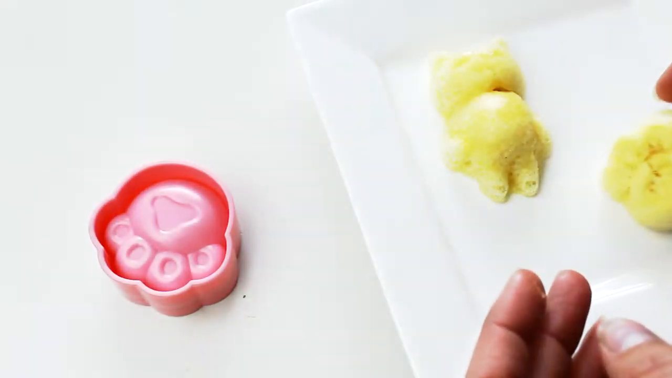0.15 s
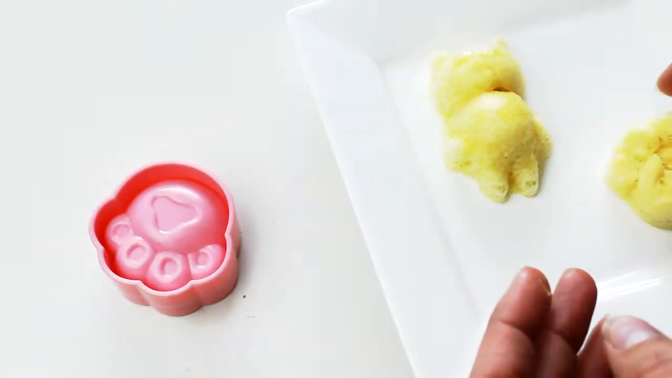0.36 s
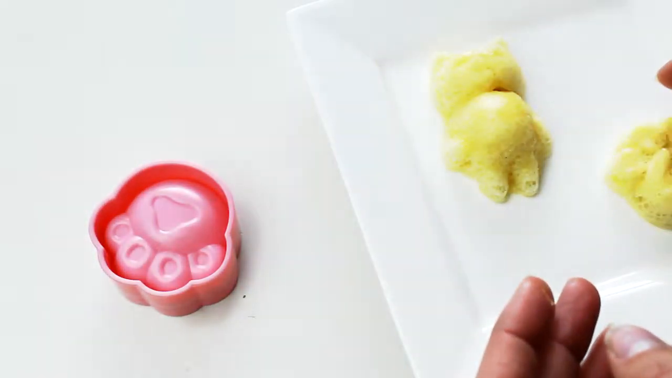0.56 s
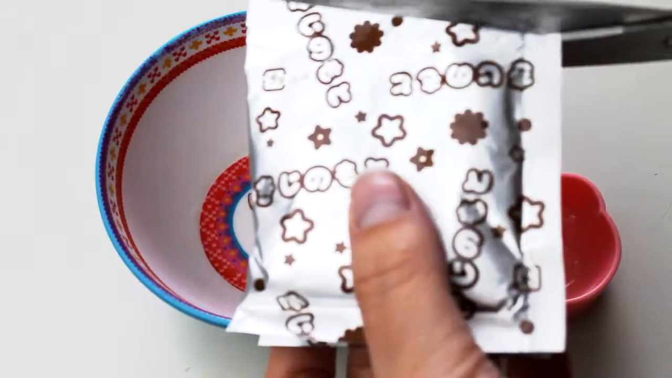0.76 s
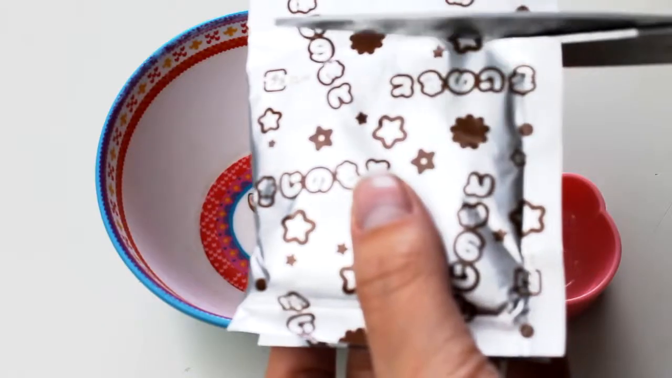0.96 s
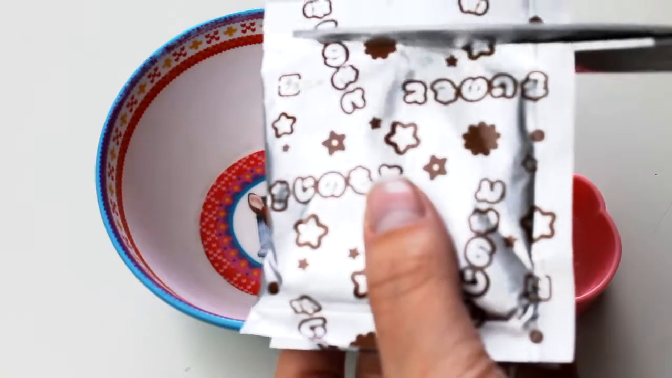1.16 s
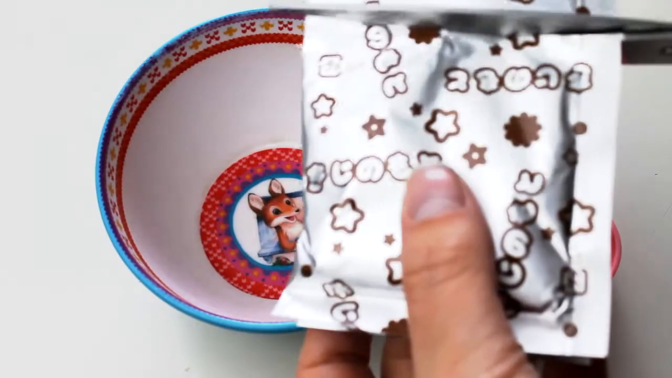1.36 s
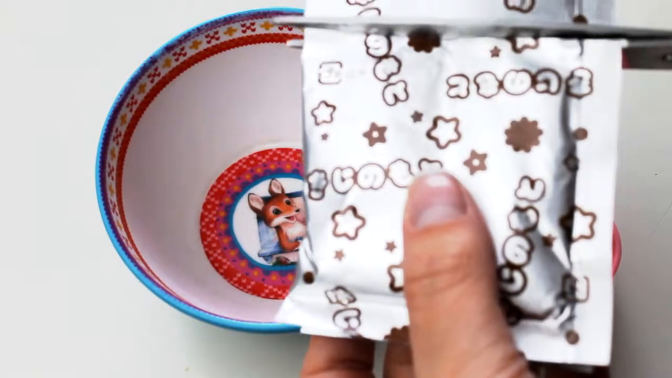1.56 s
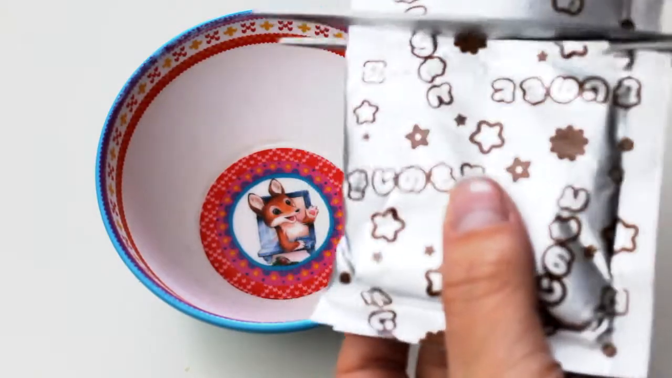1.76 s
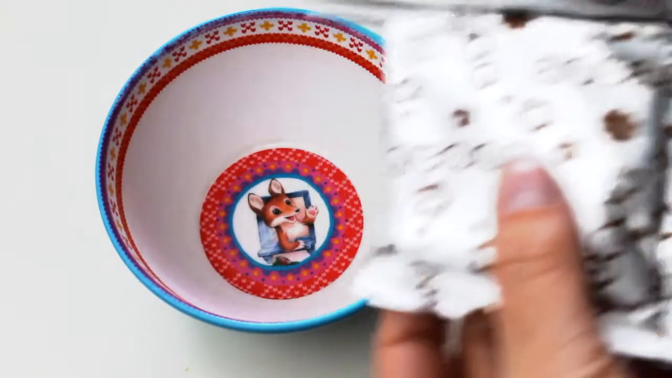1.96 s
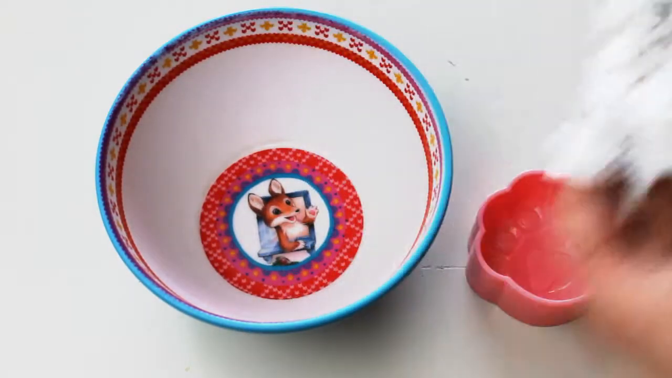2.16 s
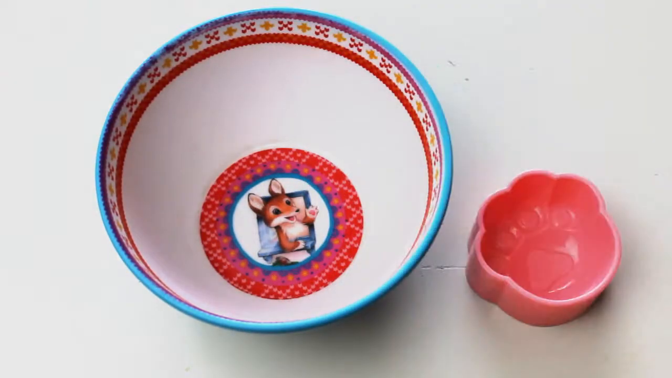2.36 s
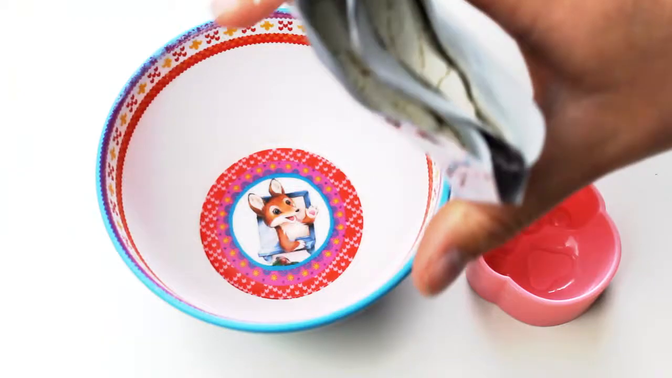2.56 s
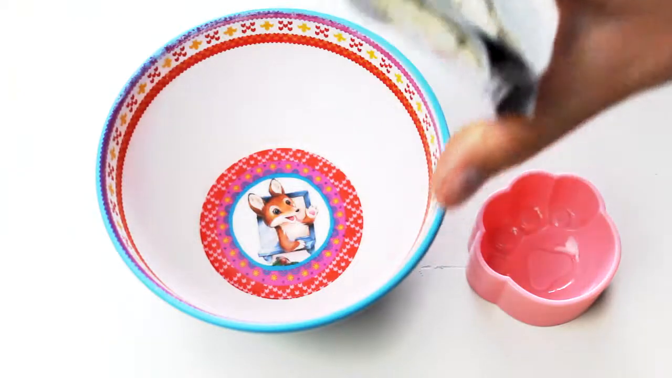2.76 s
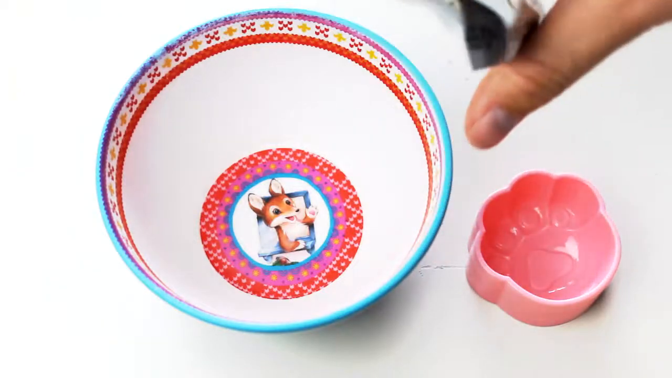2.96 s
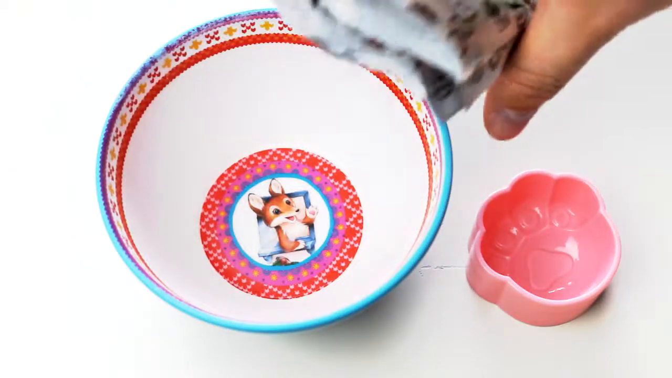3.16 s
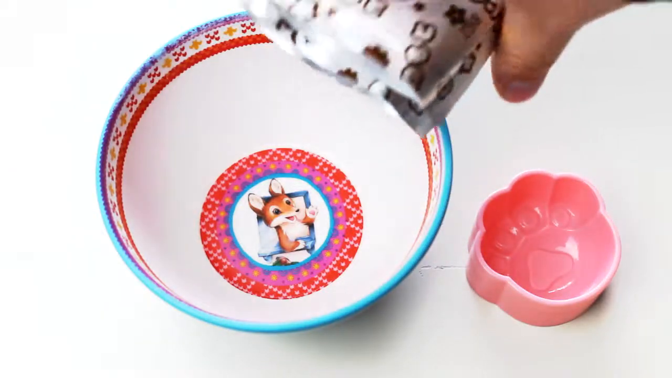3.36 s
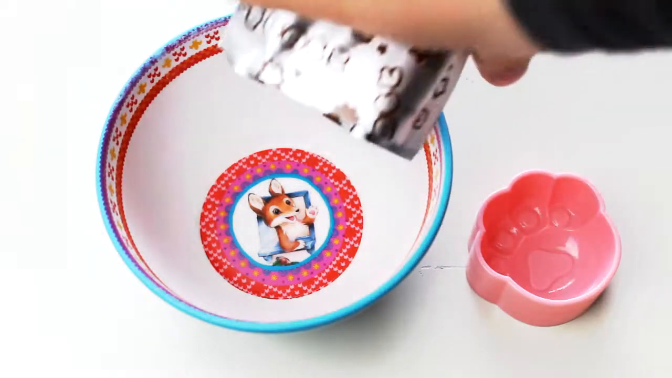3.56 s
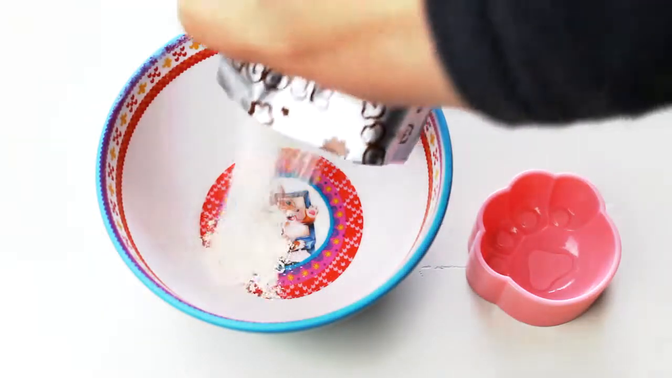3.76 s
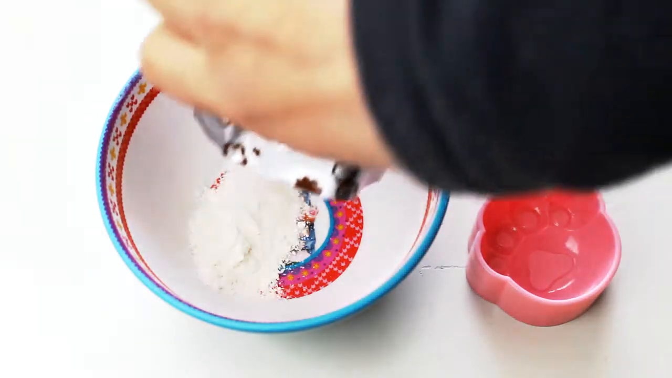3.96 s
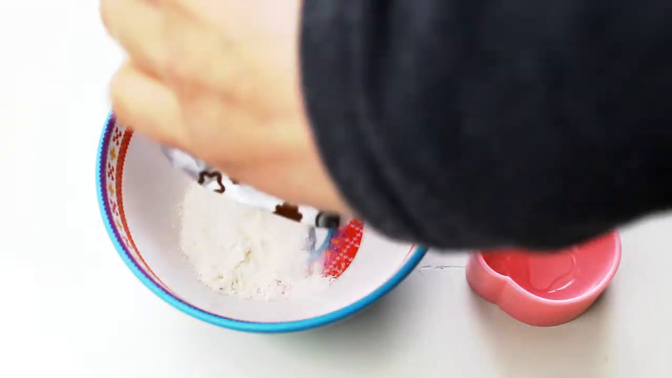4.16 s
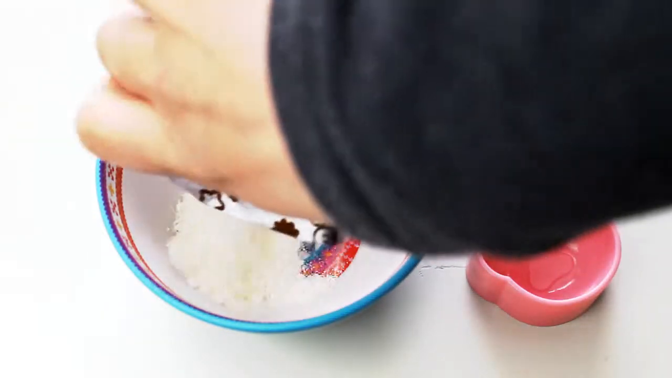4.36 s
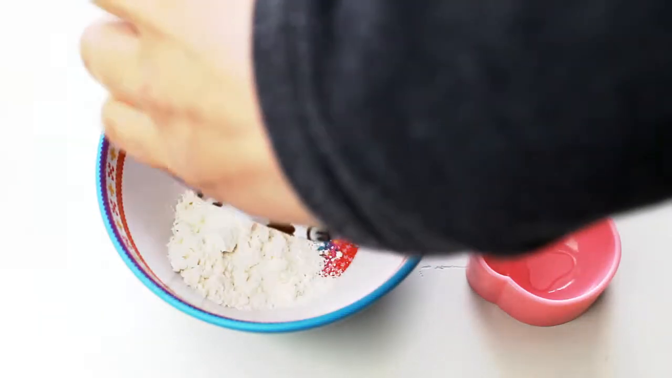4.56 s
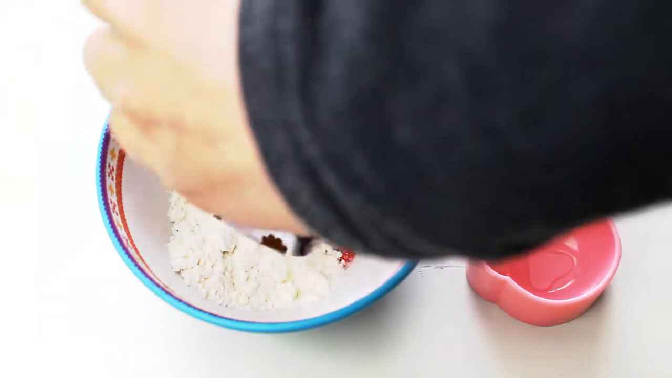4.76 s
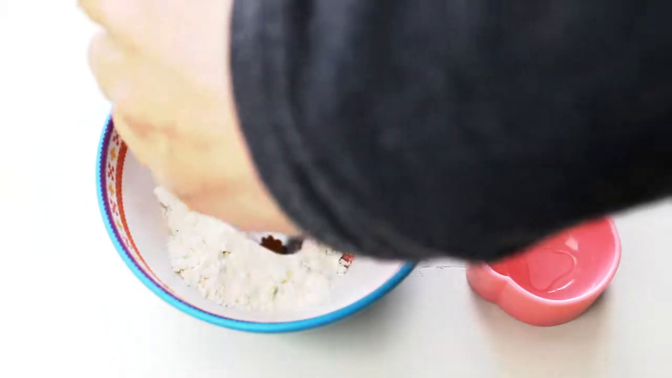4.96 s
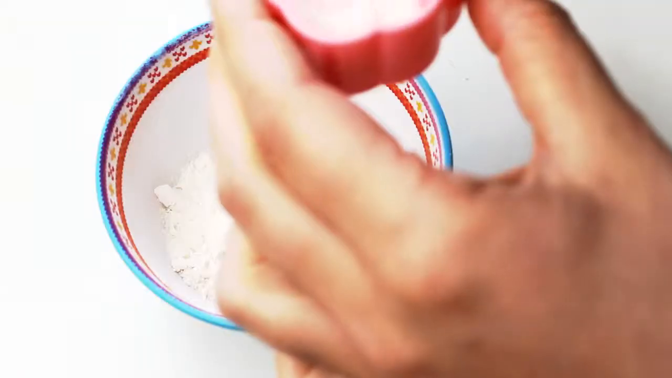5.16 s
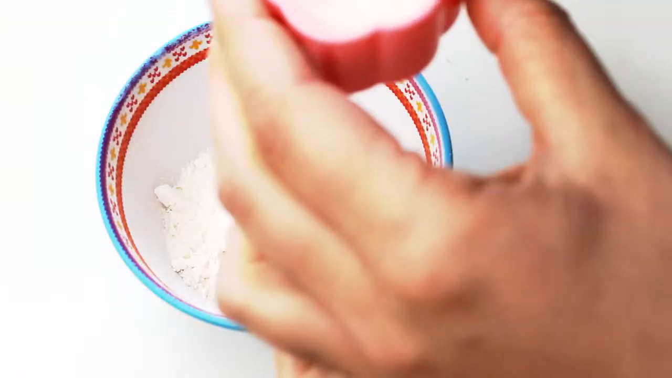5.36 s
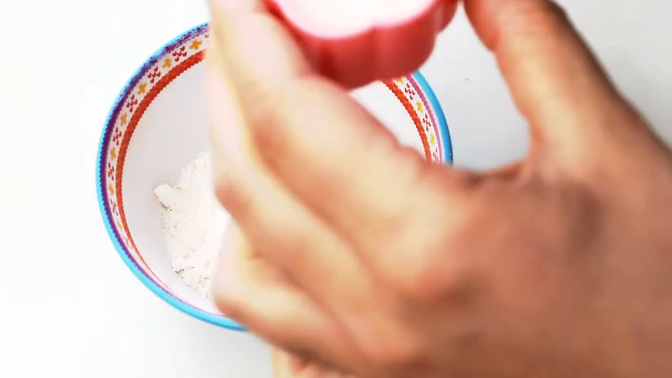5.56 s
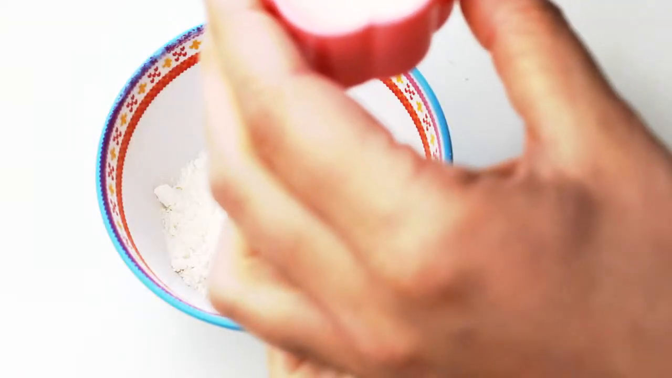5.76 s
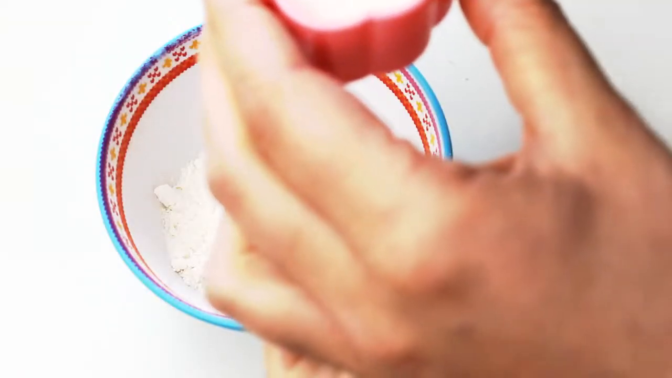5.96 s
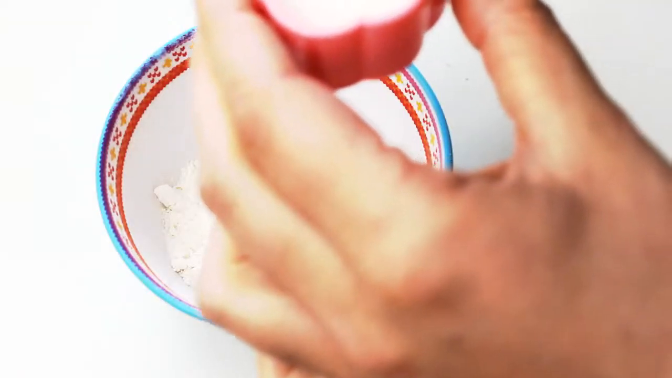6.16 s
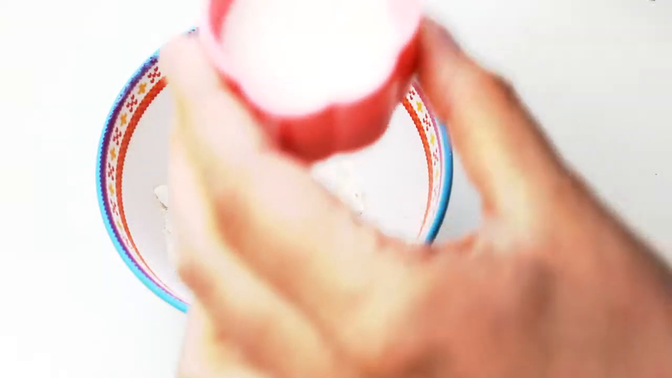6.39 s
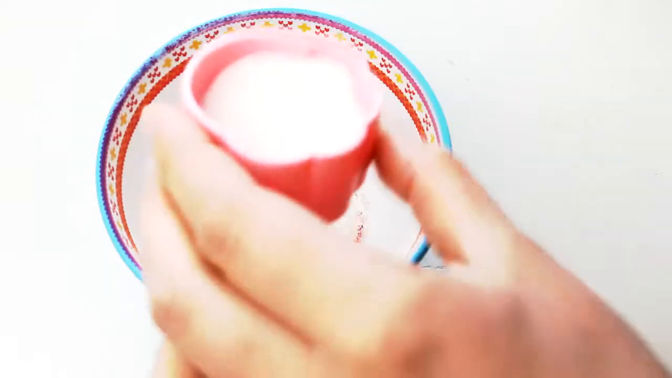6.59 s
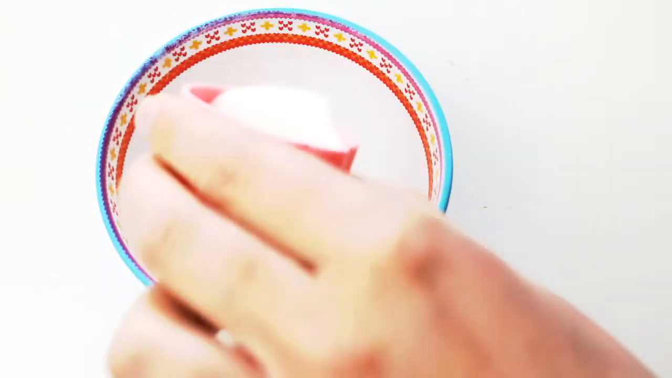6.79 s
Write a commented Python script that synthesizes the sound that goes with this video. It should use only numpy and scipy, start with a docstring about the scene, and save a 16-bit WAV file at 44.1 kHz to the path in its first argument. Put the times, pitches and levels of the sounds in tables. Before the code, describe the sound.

A low sliding rumble gives way to dry, bright foil crackle as blades cut a packet near the microphone. The crinkling fades and cuts to background hiss. Small taps follow, then grainy powder slides out in soft bursts, with hollow rattles, hard foil snaps and a brief ringing bowl knock. Short indoor echoes surround it; only faint hiss and hum remain.

```python
"""Something slides over the table with a soft rumble, then scissors snip open a foil sachet of powder, close by.
Blades crunch through the foil as streams of tiny fractures; creases snap as short noise bursts with ringing panels.
Grainy noise hisses as powder is squeezed and tipped into a bowl, whose modes ring when the sachet knocks it.
A small room adds echoes and a short tail; steady hiss lies beneath, with a faint hum once the crinkling ends."""
import sys
import numpy as np
from scipy import signal
from scipy.io import wavfile
from scipy.ndimage import map_coordinates

SR = 44100
rng = np.random.default_rng(int(sys.argv[2]) if len(sys.argv) > 2 else 0)


def pcm_store(signal):
    """Save signal as 16-bit PCM."""
    levels = np.round(np.clip(np.atleast_2d(signal), -1, 1) * 32767)
    wavfile.write(sys.argv[1], SR, levels.astype(np.int16).T)


N = 301203
TIME = np.arange(N) / SR
OPEN_S = 3.2  # from here on the sachet is open

# single creases that snap, loud and faint: (time [s], crack level [dB], crack pitch [Hz],
# panel ring over crack [dB], panel pitch [Hz], decay [s])
CREASES = [(.739, -50, 7350, -13, 1430, .003), (0.7666, -32.5, 3830, -4.5, 1860, 0.0028),
           (.786, -43, 3900, -1, 1640, 0.002), (.8076, -40.5, 6040, 6, 2880, 0.0058),
           (0.8193, -30.5, 5260, 4.5, 1890, .0024), (0.8487, -34.5, 4860, 4, 1910, 0.0034),
           (.8592, -31, 5300, -4, 2020, 0.001), (0.8672, -32.5, 4200, 4.5, 1740, 0.0022),
           (0.922, -39.5, 6200, 8.5, 1750, 0.0022), (0.9397, -20.5, 6520, -4.5, 1570, 0.0032),
           (0.9617, -27, 7000, 2, 2200, 0.0015), (0.9894, -23.5, 6500, -2, 2280, 0.00046),
           (1.0307, -22, 4670, -3.5, 1880, 0.0016), (1.0514, -25.5, 6500, -1.5, 2690, 0.0012),
           (1.1313, -41.5, 6000, 9.5, 2310, 0.00033), (1.1771, -46.5, 6150, 7, 1870, 0.0048),
           (1.2588, -31.5, 5380, 3.5, 3030, 0.0008), (1.273, -37, 8200, -20, 1300, 0.0038),
           (1.3578, -30, 4600, -1.5, 1230, 0.004), (1.375, -36.5, 5400, 3, 1790, .001),
           (1.3838, -26.5, 4190, -6.5, 1900, 0.0026), (1.434, -36, 6940, -6, 2810, 0.002),
           (1.4665, -31, 7700, 0.5, 1840, 0.0037), (1.5009, -34, 7600, -15, 1410, .005),
           (1.5249, -31.5, 4140, -6, 2060, 0.0012), (1.6641, -39, 4330, 6, 1940, 0.0033),
           (1.673, -41, 4560, 10, 2430, 0.0025), (1.698, -32, 4140, -2.5, 1980, 0.0032),
           (1.765, -36.5, 4750, 7, 2250, 0.0052), (1.7956, -24.5, 5780, -9, 1960, 0.0023),
           (1.886, -17.5, 4630, -8, 2540, 0.0037), (1.9252, -32.5, 8200, 13, 1930, 0.0008),
           (2.0184, -31, 4380, -3, 1960, 0.0034), (2.03, -44.5, 4200, 6.5, 1940, 0.0013),
           (2.0786, -47.5, 6500, -2, 1920, 0.0022), (2.1458, -38.5, 7060, -5, 1670, 0.0038),
           (2.2403, -33.5, 5440, -7, 1320, 0.0028), (2.372, -54, 8400, -6, 1950, 0.0052),
           (2.4027, -48, 7000, -10, 2030, 0.0019), (2.9125, -62, 5090, 13.5, 1474, 0.0047),
           (2.9397, -51.5, 5400, -1, 2270, 0.0027), (3.5188, -44, 4040, 3, 2760, 0.002),
           (3.558, -46, 6000, 6.5, 1400, 0.00078), (3.6435, -31.5, 5670, -0.5, 1230, 0.0026),
           (3.653, -26, 5000, 0, 2000, 0.00051), (3.7105, -55.5, 4310, 15, 2380, 0.0019),
           (3.725, -45.5, 4900, 17.5, 1620, 0.0023), (3.88, -52.5, 7000, 20, 1800, 0.0012),
           (3.8906, -20.5, 5810, -3, 2180, 0.001), (3.9819, -23, 6270, -2, 2000, 0.0011),
           (4.1355, -20.5, 5100, 0, 1900, .0024), (4.2075, -33, 4600, 3.5, 2190, 0.003),
           (4.4223, -50, 4500, 14, 1550, .0048), (4.6077, -57, 5600, 21, 1880, 0.001),
           (4.6188, -32, 4350, -0.5, 1940, 0.002), (4.642, -30.5, 5570, 2, 1870, 0.0019),
           (4.6826, -30.5, 5500, 10, 2180, 0.0018), (4.6931, -26.5, 6440, 5.5, 1900, 0.0016),
           (4.6985, -26.5, 5660, 10, 2100, 0.0028), (4.7098, -26, 4400, 4, 2060, 0.0044),
           (4.7727, -36.5, 4600, 4, 1280, 0.0027), (4.815, -36, 6900, -1, 1800, 0.0027),
           (4.8282, -30.5, 5430, 6, 1530, 0.003), (4.938, -48.5, 6000, 9, 2250, 0.0046),
           (4.9572, -44, 4500, 12, 2150, 0.0025), (4.9696, -25.5, 6170, -1, 1520, .002),
           (4.986, -38, 3570, 7, 2140, 0.0029), (5.0754, -35, 6800, 1.5, 1830, 0.0034)]


def snaps():
    """Single creases flip one by one, each releasing its own burst."""
    out = np.zeros(N)
    for start, *crease in CREASES:
        add(out, start, snap(*crease, start > OPEN_S))
    return out


# relative spectrum of a snap's bright edge: (frequency [Hz], level [dB per Hz])
EDGE_SPECTRUM = [(4500, -21), (7500, 1.5), (9500, -2.5), (12000, -9), (16000, -11)]
# relative spectrum of a snap's dull body: (frequency [Hz], level [dB per Hz])
BODY_SPECTRUM = [(150, -15.5), (380, -12.5), (700, -1.5), (1200, -4.5), (1800, -16.5)]
# the higher the crack, the brighter its edge
EDGE_DB, EDGE_AT_HZ, EDGE_DB_PER_OCTAVE = -9, 5360, 25.5
# big, slow flips push the whole sachet, up to a ring limit; once open, it is pushed less
BODY_DB, BODY_DB_PER_DOUBLING, USUAL_DECAY_S = -6.5, 4.5, 0.002
BODY_RING_LIMIT_DB, OPEN_BODY_DB = 8.5, -8
ATTACK_SHARE = 0.088  # rise time over decay time: slow creases also start slowly


def snap(crack_db, crack_hz, ring_db, ring_hz, decay, is_open):
    """A crease flips in a short burst: a crack with a bright edge, a ringing panel and a push of the sachet."""
    t = np.arange(1100) / SR
    level_scale = np.sqrt(0.005 * SR / len(t))  # levels are rms over 5 ms
    crack_noise, edge_noise, body_noise, ring_noise, facet_noise = rng.standard_normal((5, len(t)))
    edge_db = EDGE_DB + EDGE_DB_PER_OCTAVE * np.log2(crack_hz / EDGE_AT_HZ)
    body_db = BODY_DB + min(ring_db, BODY_RING_LIMIT_DB)
    body_db += BODY_DB_PER_DOUBLING * np.log2(decay / USUAL_DECAY_S) + OPEN_BODY_DB * is_open

    # the flip runs along the crease for a moment, then the foil dies away
    attack = 1 - np.exp(-t / (ATTACK_SHARE * decay))
    burst = attack * (np.exp(-(t / (1.12 * decay)) ** 2) + 0.28 * np.exp(-t / 0.0038))

    # the small facet beside the crease rings high, the large panel low
    facet = unit(band(facet_noise * burst, crack_hz * 0.96, crack_hz * 1.02, order=1))
    crackle = unit(band(crack_noise * burst, 3820, 6620))
    crack = unit(band(facet + 0.88 * crackle, 1700, 9500))
    panel = np.sin(2 * np.pi * ring_hz * t) * (1 - np.exp(-t / 0.00029)) * np.exp(-t / decay)
    rough_ring = unit(band(ring_noise * burst, 1290, 3050, order=3))
    ring = unit(1.2 * unit(band(panel, 560, 7000)) + rough_ring)

    edge = amp(edge_db) * colour(edge_noise * burst, EDGE_SPECTRUM)
    body = amp(body_db) * colour(body_noise * burst, BODY_SPECTRUM)
    return level_scale * amp(crack_db) * (crack + edge + body + amp(ring_db) * ring)


# bites of the blades: (start [s], length [s], crunch level [dB])
BITES = [(.855, 0.022, -44.5), (0.938, 0.041, -37.5), (1.026, 0.024, -32), (1.238, 0.1, -41),
         (1.442, 0.048, -33.5), (1.68, 0.063, -40), (1.818, 0.059, -34.5)]
# short crackles: foil scraping at first, later settling after a snap: (start [s], length [s], crunch level [dB])
FOIL_CRACKLES = [(2.125, .045, -43.5), (2.227, .012, -47.5), (4.135, 0.0089, -40), (4.648, .008, -42)]


def cutting_motion():
    """Bites and short crackles drive the crunch, each with a fast rise and a slower fall in dB per second."""
    bites = [swell(*row, rise=1000, fall=223) for row in BITES]
    crackles = [swell(*row, rise=1000, fall=228) for row in FOIL_CRACKLES]
    return together(bites + crackles)


# the fingers shift their grip and draw the sachet away: (time [s], flexing level [dB])
GRIP_SHIFTS = [(0.821, -42.5), (.95, -39), (1.055, -40.5), (1.18, -53), (1.255, -42.5), (1.36, -39.5),
               (1.53, -46), (1.755, -42), (1.945, -41.5), (2.04, -52), (2.15, -44.5), (2.225, -47),
               (2.345, -50.5), (2.42, -56)]


def gripping_motion():
    """Each shift of the fingers bends the foil briefly."""
    return together(swell(start, 0, db, rise=395, fall=173) for start, db in GRIP_SHIFTS)


# relative spectrum of the tearing foil: (frequency [Hz], level [dB per Hz])
CRUNCH_SPECTRUM = [(1500, -9.5), (2600, 0), (4500, 0.5), (7000, 1), (10000, -4.5), (13000, -3.5),
                   (16000, -12)]
# relative spectrum of the bending sheet: (frequency [Hz], level [dB per Hz])
FLEX_SPECTRUM = [(80, -28), (200, -19), (310, -2.5), (430, -0.5), (800, 0.5), (1300, 4), (2100, 3.5),
                 (2900, -9), (4500, -22)]
SNIP_FLEX_DB, GRIP_CRUNCH_DB = -2.5, -9  # each motion's share of the other's sound


def scissors(cutting, gripping):
    """The foil gives way in a stream of tiny fractures, which shake the sheet and pop its wrinkles."""
    fractures = grains(per_s=1300, spread_db=1.5, smooth=0.7) * amp(2.3 * wander(rate=220))
    buckles = grains(per_s=350, spread_db=2.5, smooth=0.35)
    crunch = shifting(colour(fractures, CRUNCH_SPECTRUM), depth_db=3.0, width_hz=443, hold=0.03)
    crunch = crunch + amp(-8) * ticks(per_s=380)
    flex = shifting(colour(fractures + 0.7 * buckles, FLEX_SPECTRUM), depth_db=4.0, width_hz=258, hold=0.02)
    crunch_gain = together([cutting, amp(GRIP_CRUNCH_DB) * gripping])
    flex_gain = together([gripping, amp(SNIP_FLEX_DB) * cutting])
    return crunch_gain * crunch + flex_gain * flex


SMALL_PER_S, SMALL_DB, SMALL_SPREAD_DB = 45, -3, 2  # levels against that of the moving foil
SMALL_HZ, SMALL_PANEL_HZ, SMALL_SPREAD_OCTAVES = 5960, 2080, 0.23
SMALL_RING_DB, SMALL_DECAY_S = -6, 0.00048


def small_creases(motion):
    """Small creases flip at random, as strongly as the foil is being moved."""
    out = np.zeros(N)
    flips = rng.random(N) < SMALL_PER_S / SR
    size, pitch, panel = rng.uniform(-1, 1, (3, N))
    for i in np.flatnonzero(flips & (motion > amp(-70))):
        crack_db = SMALL_DB + SMALL_SPREAD_DB * size[i]
        crack_hz = SMALL_HZ * 2 ** (SMALL_SPREAD_OCTAVES * pitch[i])
        panel_hz = SMALL_PANEL_HZ * 2 ** (SMALL_SPREAD_OCTAVES * panel[i])
        crease = snap(crack_db, crack_hz, SMALL_RING_DB, panel_hz, SMALL_DECAY_S, TIME[i] > OPEN_S)
        add(out, TIME[i], motion[i] * crease)
    return out


def ticks(per_s, count=24):
    """Tiny wrinkles pop at many pitches, each pop dying away within a few cycles."""
    out, t = np.zeros(N), np.arange(400) / SR
    for hz in np.geomspace(1500, 14000, count):
        pop = np.sin(2 * np.pi * hz * t) * t * np.exp(-t * hz / 0.56)
        size = amp(11.0 * np.minimum(rng.exponential(1, N), 3.5))
        hits = size * (rng.random(N) < per_s / count / SR)
        out += signal.oaconvolve(hits, unit(pop))[:N]
    return unit(out)


# runs of powder: (start [s], length [s], hiss level [dB])
POWDER_RUNS = [(3.643, 0.1, -50.5), (3.808, 0.064, -48.5), (4.002, 0.16, -49.3), (4.193, 0.18, -47.5),
               (4.565, 0.28, -49.5), (4.974, 0.014, -51.5)]


def pouring_motion():
    """Each run of powder swells up, holds and dies away."""
    return together(swell(*row, rise=144, fall=171) for row in POWDER_RUNS)


# shakes of the open sachet: (time [s], hollow level [dB])
SACHET_SHAKES = [(3.725, -44), (4.17, -42), (4.35, -41.5), (4.655, -36.5), (4.713, -32), (4.81, -38),
                 (4.978, -36), (5.06, -49)]
SHAKE_RISE_DB_PER_S = 373


def shaking_motion():
    """Each shake jolts the open sachet briefly."""
    return together(swell(start, 0, db, SHAKE_RISE_DB_PER_S, fall=216) for start, db in SACHET_SHAKES)


# relative spectrum of grains on foil: (frequency [Hz], level [dB per Hz])
POWDER_SPECTRUM = [(1800, -30), (2900, -14.5), (4000, 0), (6000, 2), (7300, 3), (8800, -2), (11000, -4),
                   (16000, -9)]
# relative spectrum of the hollow sachet and bowl: (frequency [Hz], level [dB per Hz])
HOLLOW_SPECTRUM = [(90, -30.5), (230, -20.5), (310, -3), (430, -12), (700, -6), (950, -4), (1220, 0),
                   (1500, -9.5), (1900, 2), (2250, 2.5), (2700, -6.5), (4200, -20)]
POUR_HOLLOW_DB, SHAKE_HISS_DB = 1, -14.5
CAVITY_HZ, CAVITY_WIDTH_HZ, CAVITY_DB = 320, 70, -21.5  # air in the sachet booms faintly during pours
SHAKE_LOW_HZ = 242  # the shaken sachet rattles with little bass


def powder(pouring, shaking):
    """Fine grains rub down the foil; sachet and bowl lend a hollow tone, which lumps set off unevenly."""
    flow = grains(per_s=3500, spread_db=2.5, smooth=0.8) * amp(1.5 * wander(rate=88))
    lumps = grains(per_s=700, spread_db=3.5, smooth=0.47) * amp(1.8 * wander(rate=52))
    loose = grains(per_s=730, spread_db=2.5, smooth=0.69) * amp(0.63 * wander(rate=78))
    hiss = shifting(colour(flow, POWDER_SPECTRUM), depth_db=1.9, width_hz=630, hold=0.039)
    hollow = shifting(colour(flow + lumps, HOLLOW_SPECTRUM), depth_db=4.5, width_hz=325, hold=0.018)
    rattle = unit(band(colour(loose, HOLLOW_SPECTRUM), SHAKE_LOW_HZ, 7100, order=4))
    boom = unit(band(lumps, CAVITY_HZ - CAVITY_WIDTH_HZ / 2, CAVITY_HZ + CAVITY_WIDTH_HZ / 2))
    hiss_gain = together([pouring, amp(SHAKE_HISS_DB) * shaking])
    pour_body = amp(POUR_HOLLOW_DB) * hollow + amp(CAVITY_DB) * boom
    return hiss_gain * hiss + pouring * pour_body + shaking * rattle


# the sachet knocks the bowl: (time [s], level [dB])
BOWL_KNOCKS = [(4.698, -32), (4.829, -42.5)]
# modes of the bowl: (frequency [Hz], level over knock [dB], t60 [s])
BOWL_MODES = [(773, 8.5, 0.03), (1160, 2.5, 0.28), (1160, 10.5, 0.029), (1384, 0, 0.21), (1530, 8, 0.088),
              (2130, -3, 0.14), (1930, -35, .15), (2275, 4, 0.069), (3380, -8, .15)]


def bowl():
    """Each soft knock sets the bowl's modes ringing briefly."""
    out, t = np.zeros(N), np.arange(SR // 2) / SR
    for start, knock_db in BOWL_KNOCKS:
        for hz, db, t60 in BOWL_MODES:
            decay = np.exp(-np.log(1000) * t / t60)
            mode = np.sin(2 * np.pi * hz * t) * rng.choice([-1, 1])
            add(out, start, amp(knock_db + db) * decay * mode)
    return band(out, 590, 4900, order=4)


def landing():
    """The heap of powder drops into the bowl with a soft, low thud."""
    thud = unit(band(rng.standard_normal(N), 72, 210))
    return swell(3.915, 0, -62.5, SHAKE_RISE_DB_PER_S, fall=110) * thud


# faint light taps of things being handled: (time [s], peak level [dB], ring pitch [Hz])
LIGHT_TAPS = [(0.221, -55, 2380), (3.043, -49.5, 2380), (3.318, -48, 2560)]


def taps():
    """Each tap rings briefly at one pitch."""
    out, t = np.zeros(N), np.arange(1500) / SR
    for start, db, hz in LIGHT_TAPS:
        add(out, start, amp(db) * np.sin(2 * np.pi * hz * t) * np.exp(-t / 0.004))
    return out


# relative spectrum of the table top under the slide: (frequency [Hz], level [dB per Hz])
RUMBLE_SPECTRUM = [(60, -43), (120, -15), (170, -9), (200, -2), (240, -5), (275, -8), (400, -26),
                   (900, -27), (3000, -32)]
RUMBLE_DB = -59.5  # steady until the first cut
JUDDER_HZ, JUDDER_WAVER, JUDDER_FLUTTER_DB = 236, 0.077, 0.7  # stick-slip rate, its rms share of waver, flutter


def slide():
    """Friction stirs a low resonance of the table top; as the push firms up it judders at an unsteady pitch."""
    turns = np.cumsum(JUDDER_HZ * (1 + JUDDER_WAVER * wander(rate=45))) / SR
    judder = np.sqrt(2) * np.sin(2 * np.pi * turns) * amp(JUDDER_FLUTTER_DB * wander(rate=30))
    push = swell(0.32, 0.16, -54, rise=400, fall=21)
    rumble = amp(RUMBLE_DB) * colour(rng.standard_normal(N), RUMBLE_SPECTRUM)
    return (rumble + push * judder) * (TIME < CUTS[0][0])


def brush():
    """Fingers rub softly over a plastic cup: a narrow band of noise that swells and fades."""
    return swell(6.65, 0, -65, rise=120, fall=120) * unit(band(rng.standard_normal(N), 1420, 1640))


# relative spectrum of the steady hiss: (frequency [Hz], level [dB per Hz])
HISS_SPECTRUM = [(25, -12), (45, -9), (62, -4), (85, -1.5), (140, -2), (205, 8), (300, 4), (420, 3),
                 (900, 0), (2000, -2.5), (7200, -9), (7900, -8.5), (9600, -14.5), (16000, -17.5)]
BACKGROUND_HISS_DB, DRONE_DB, HUM_HZ, HUM_DB = -59, -81.5, 489, -67.5


def background():
    """Steady coloured noise; from the last cut also a hum and a low drone."""
    hiss = amp(BACKGROUND_HISS_DB) * colour(rng.standard_normal(N), HISS_SPECTRUM)
    drone = amp(DRONE_DB) * unit(band(rng.standard_normal(N), 46, 88))
    return hiss + (tone(HUM_HZ, HUM_DB) + drone) * (TIME >= CUTS[-1][0])


def tone(hz, db):
    """A faint sine line whose pitch wavers slightly."""
    turns = np.cumsum(hz * (1 + 0.0019 * wander(rate=40))) / SR
    return np.sqrt(2) * amp(db) * np.sin(2 * np.pi * turns)


# reverberation time of the room: (frequency [Hz], t60 [s])
ROOM_DECAY = [(200, 0.95), (1000, 0.28), (4000, 0.37), (8000, 0.11), (16000, 0.044)]
# early echoes from table and walls: (delay [s], gain [ratio])
EARLY_ECHOES = [(.0046, 0.015), (0.0118, 0.016), (0.0134, .08), (.021, 0.054)]


def room(x, tail_db):
    """A few echoes from table and walls, with a short diffuse tail that decays at its own rate per frequency."""
    hz, t, noise = signal.stft(rng.standard_normal(SR // 2), SR, nperseg=256)
    decay = np.exp(-np.log(1000) * t / read(ROOM_DECAY, hz)[:, None])
    tail = signal.istft(noise * decay, SR)[1]
    tail = tail * (1 - np.exp(-np.arange(len(tail)) / SR / 0.00055))
    response = amp(tail_db) * tail / np.linalg.norm(tail)
    for delay, gain in EARLY_ECHOES:
        add(response, delay, np.array([gain]))
    return x + signal.oaconvolve(x, response)[:N]


def amp(db):
    """Decibels to linear gain."""
    return 10 ** (np.asarray(db) / 20)


def unit(x):
    """Scales to rms 1."""
    return x / np.sqrt(np.mean(x ** 2) + 1e-20)


def read(points, hz):
    """Joins points by straight lines on a log-frequency axis."""
    f, value = np.transpose(points)
    return np.interp(np.log(hz + 1), np.log(f + 1), value)


def add(mix, start, sound):
    """Mixes a sound in place from its start in seconds."""
    part = mix[max(round(start * SR), 0):][:len(sound)]
    part += sound[:len(part)]


def colour(x, spectrum, size=4096):
    """Causal filter with the given spectrum, so that clicks keep their sharp fronts; rms 1."""
    hz = abs(np.fft.fftfreq(size, 1 / SR))
    octaves_above = np.maximum(np.log2((hz + 1) / spectrum[-1][0]), 0)
    octaves_below = np.maximum(np.log2(spectrum[0][0] / (hz + 1)), 0)
    gain_db = read(spectrum, hz) - 20 * (octaves_above + octaves_below)
    log_gain = np.log(amp(np.maximum(gain_db, -90)))
    # minimum phase by the Hilbert transform of the log gain
    impulse = np.fft.ifft(np.exp(np.conj(signal.hilbert(log_gain)))).real[:size // 2]
    return unit(signal.oaconvolve(x, impulse)[:len(x)])


def band(x, lo_hz, hi_hz, order=2):
    """Butterworth band-pass."""
    edges = [lo_hz, min(hi_hz, SR / 2 - 1)]
    return signal.sosfilt(signal.butter(order, edges, "band", fs=SR, output="sos"), x)


def wander(rate):
    """Slow random drift of rms 1, with rate new values per second."""
    knots = rng.standard_normal(N // 20)
    return unit(np.interp(TIME * rate, np.arange(len(knots)), knots))


def grains(per_s, spread_db, smooth):
    """Many tiny clicks of unequal size over a share of smooth friction noise."""
    size = amp(spread_db * np.minimum(rng.exponential(1, N), 4))
    clicks = size * rng.choice([-1, 1], N) * (rng.random(N) < per_s / SR)
    return unit(unit(clicks) + smooth * rng.standard_normal(N))


def shifting(x, depth_db, width_hz, hold):
    """Resonances shift as the sheet bends: random peaks and dips that each last a moment (hold, in seconds)."""
    z = signal.stft(x, nperseg=256, noverlap=192)[2]
    rows, cols = np.indices(z.shape)
    where = [rows * SR / 256 / width_hz, cols * 64 / SR / hold]
    patches = unit(map_coordinates(rng.standard_normal((200, 1500)), where, order=1, mode="wrap"))
    return unit(signal.istft(z * amp(depth_db * patches), nperseg=256, noverlap=192)[1][:N])


def swell(start, length, db, rise, fall):
    """Attack, hold and release as a gain at every sample; rise and fall in dB per second."""
    before = np.maximum(start - TIME, 0)
    after = np.maximum(TIME - start - length, 0)
    return amp(db - rise * before - fall * after)


def together(gains):
    """Unrelated sounds add in power."""
    return np.sqrt(sum(g ** 2 for g in gains))


# the sound is cut off here, room tail included; only background and brush continue: (from [s], to [s])
CUTS = [(.682, .735), (2.45, 2.8), (5.086, 6.9)]


def scene():
    """The movements of the hands drive foil and powder, heard close by in the room."""
    cutting, gripping = cutting_motion(), gripping_motion()
    pouring, shaking = pouring_motion(), shaking_motion()
    near = snaps() + scissors(cutting, gripping) + powder(pouring, shaking) + bowl() + taps()
    near = near + small_creases(together([cutting, gripping, amp(-4) * shaking]))
    near = band(near, 150, 21000)  # thin foil radiates almost no bass
    table = slide() + landing()
    kept = 1 - sum((TIME >= start) & (TIME < end) for start, end in CUTS)
    handling = (room(near, tail_db=-14.5) + table) * kept
    return (handling + brush() + background())[None]


def record(dry):
    """The band limit of the recorder: a linear-phase low-pass at 15950 Hz."""
    lowpass = signal.firwin(255, 15950, window=("kaiser", 9), fs=SR)
    return signal.oaconvolve(dry, lowpass[None], "same")


dry = scene()
out = record(dry)
pcm_store(out)
```